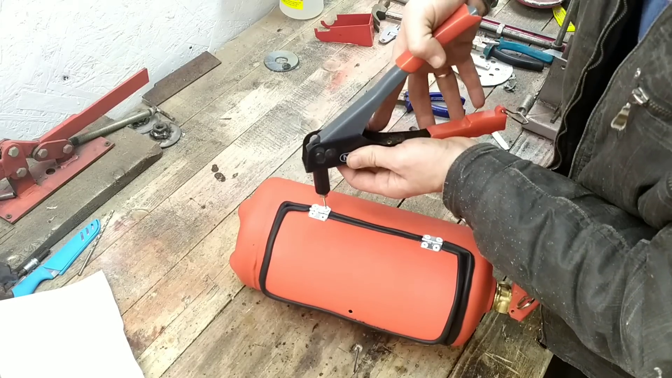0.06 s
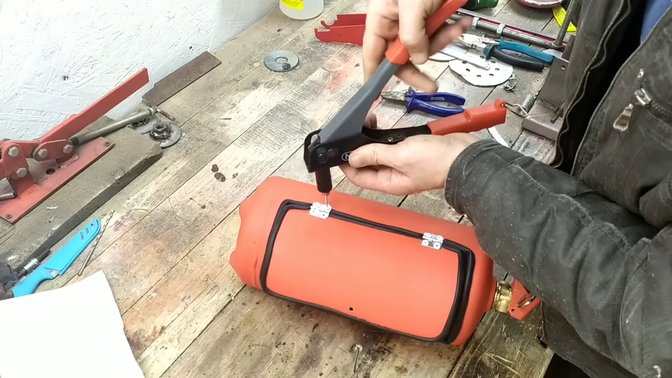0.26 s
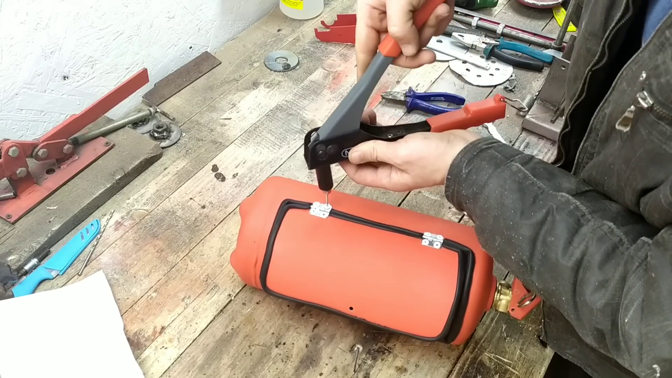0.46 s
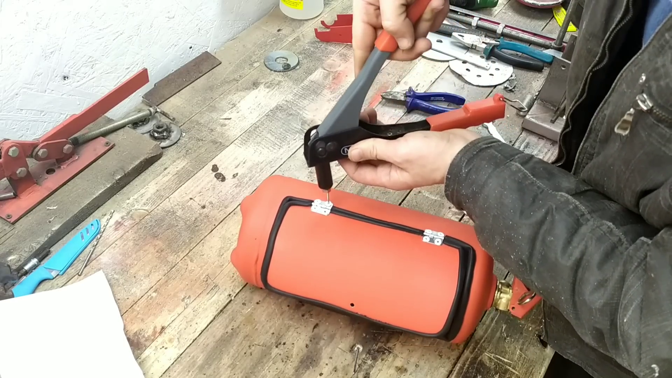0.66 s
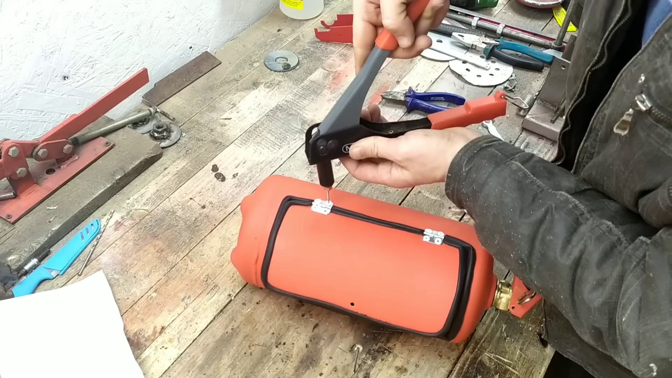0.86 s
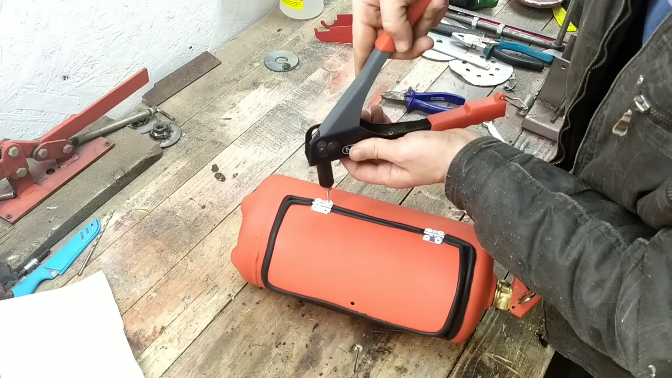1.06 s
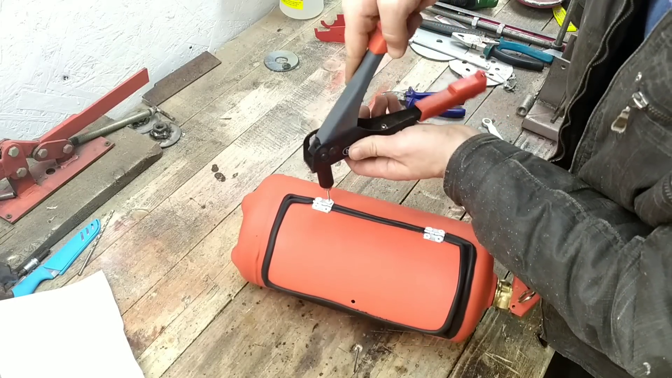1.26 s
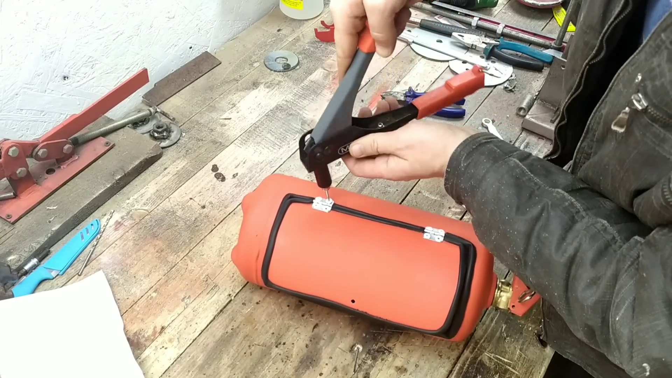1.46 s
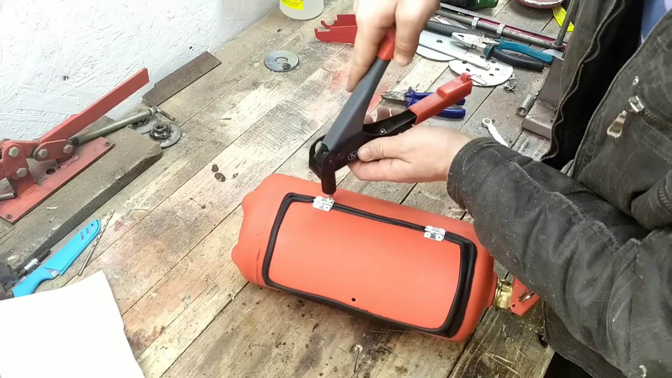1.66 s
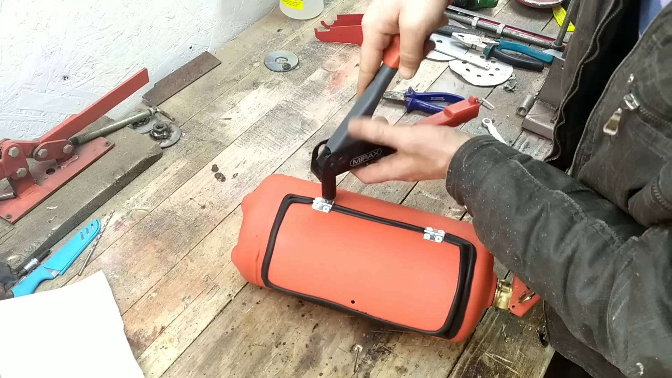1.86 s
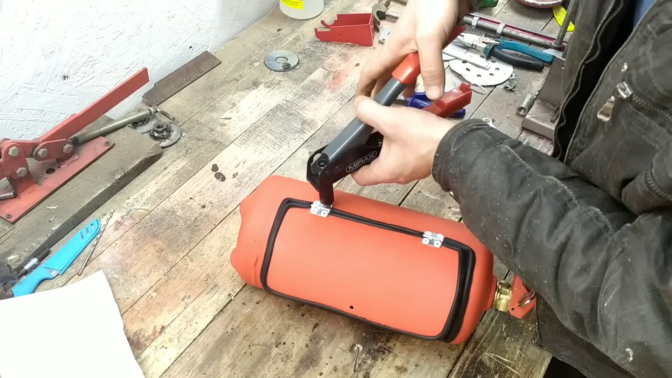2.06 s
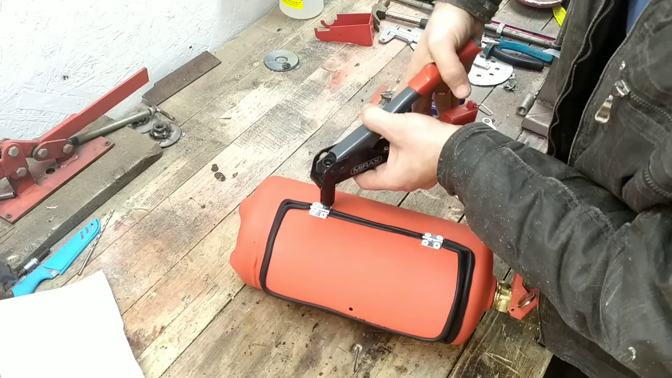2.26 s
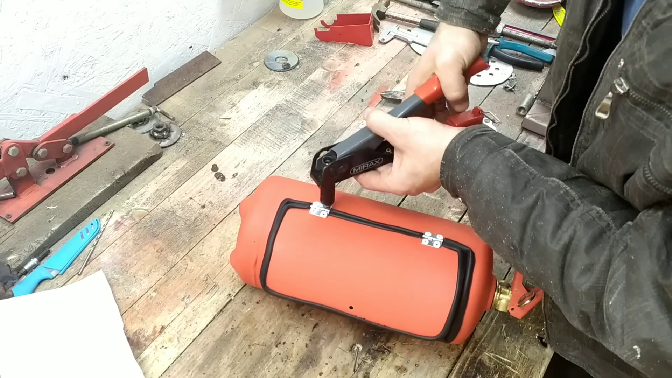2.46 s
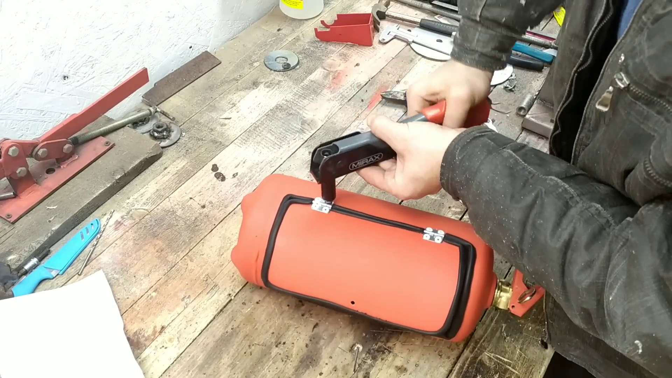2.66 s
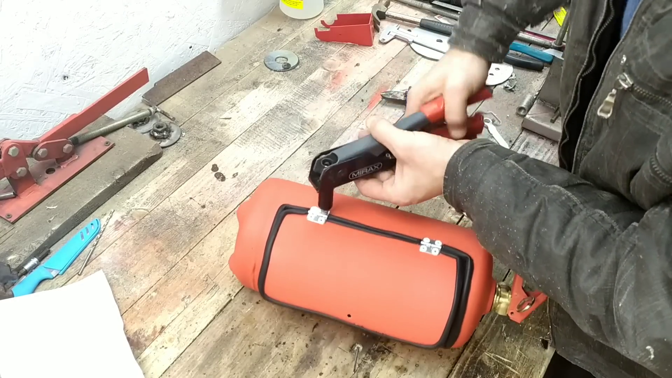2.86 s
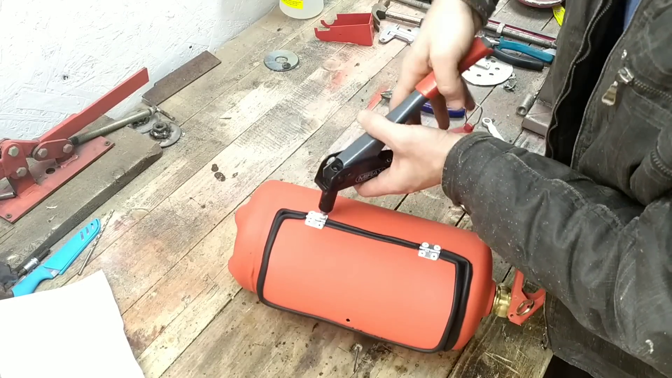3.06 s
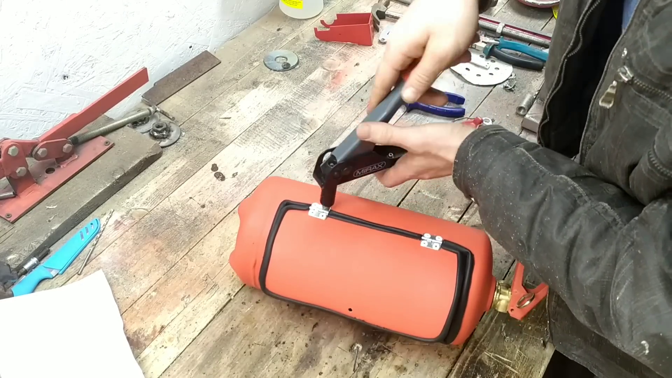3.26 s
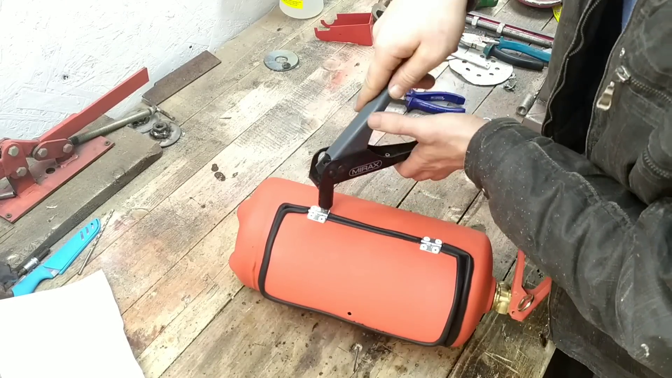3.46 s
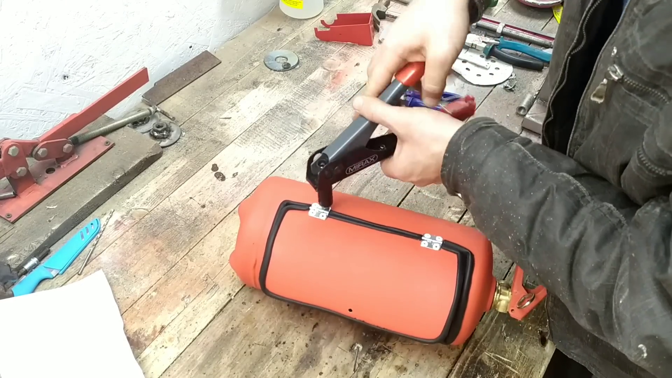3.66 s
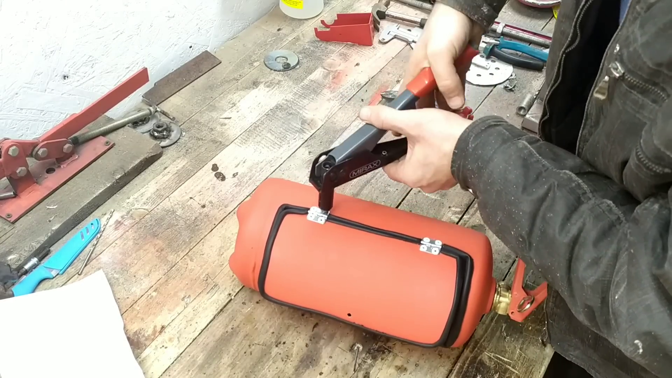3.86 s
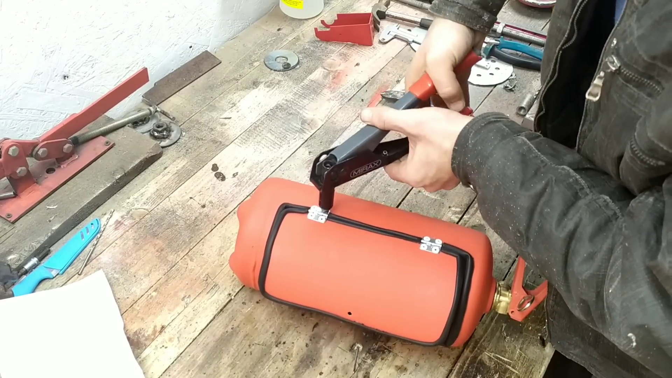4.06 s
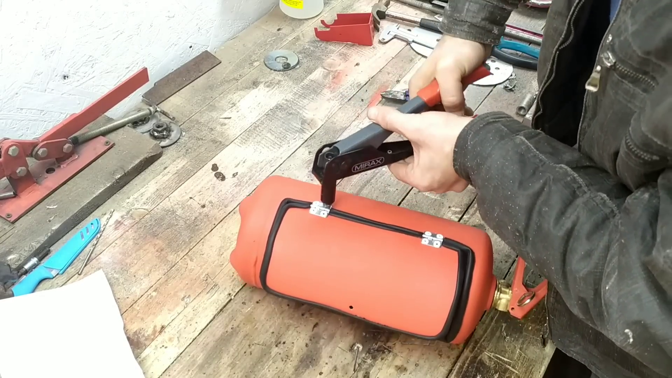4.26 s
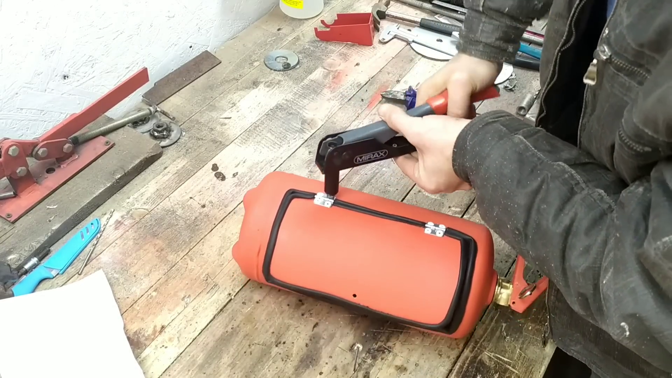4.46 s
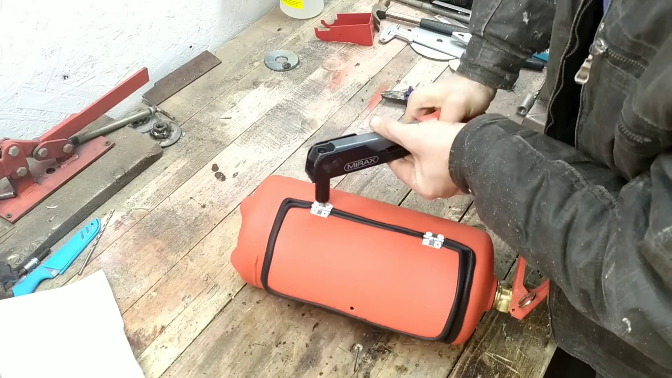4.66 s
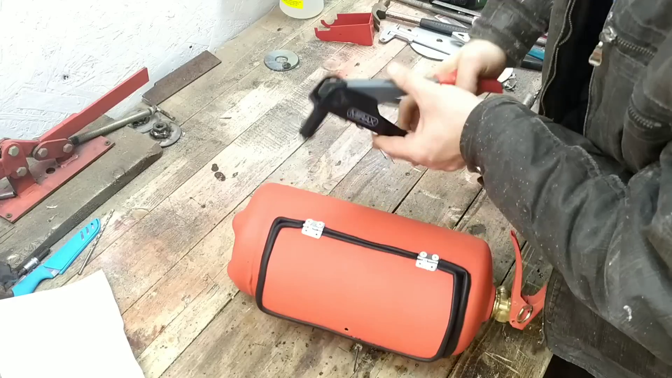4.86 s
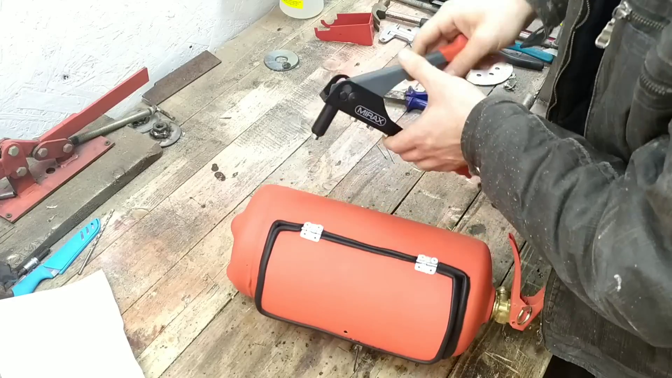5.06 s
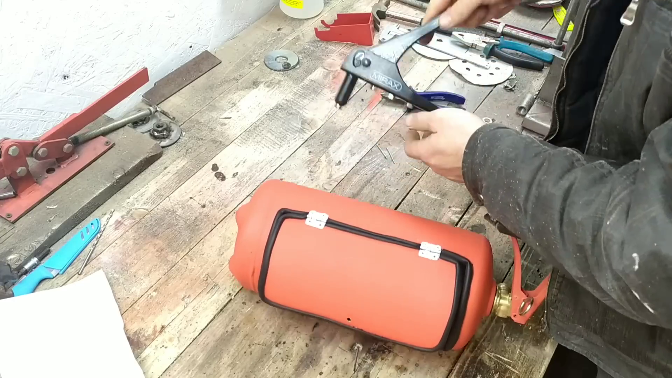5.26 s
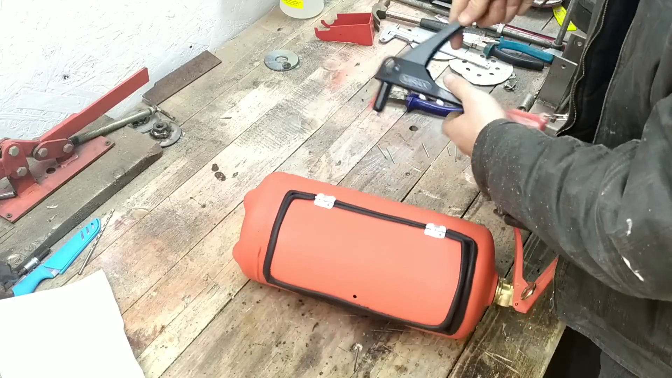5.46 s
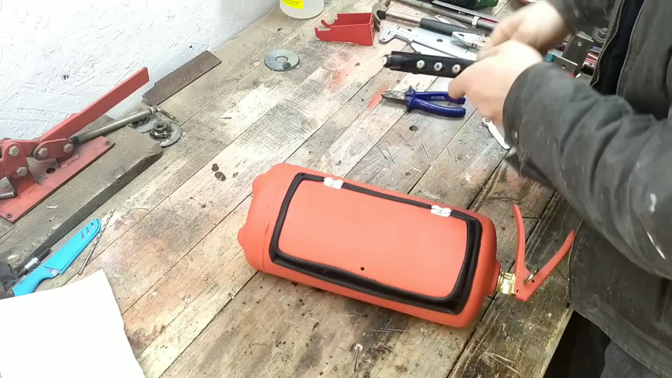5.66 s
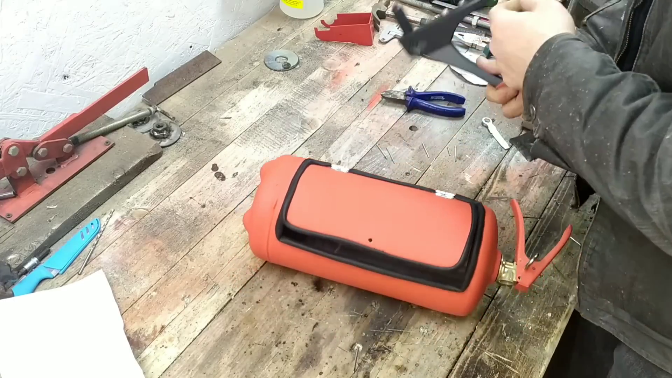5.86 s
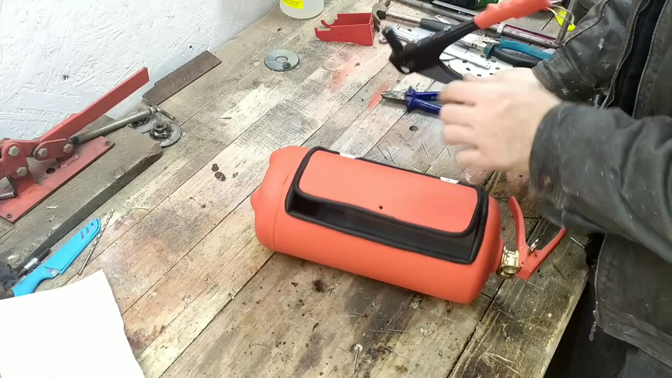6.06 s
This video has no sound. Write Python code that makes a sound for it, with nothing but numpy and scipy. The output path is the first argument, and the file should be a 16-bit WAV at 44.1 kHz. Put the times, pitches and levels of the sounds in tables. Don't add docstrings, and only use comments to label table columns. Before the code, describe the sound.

Soft cloth rustle and low bench bumps surround dry metallic clicks as a rivet tool is seated on a hollow metal shell. Dull, boomy knocks and gritty jaw slips come in irregular groups. After a near-quiet pause, one sharp crack overloads the nearby stereo phone microphone, with a short ringing tail and settling clunks. The tool is lifted away with fabric swishes in a small, lightly reverberant room.

```python
import sys
import numpy as np
from scipy import signal
from scipy.fft import rfft, irfft
from scipy.io import wavfile
from scipy.ndimage import uniform_filter1d

SR = 44100
rng = np.random.default_rng(int(sys.argv[2]) if len(sys.argv) > 2 else 0)


def master(y):
    cut = np.clip(np.atleast_2d(y).T, -1, 1)
    pcm = np.round(cut * 32767)
    wavfile.write(sys.argv[1], SR, pcm.astype(np.int16))


def rack_gain(trim_db):
    fader = np.asarray(trim_db, float)
    return 10 ** (fader / 20)


N = 269010

# mode_hz, level_db, t60_s
BENCH = [(63.36, 0, 0.58), (72.3, -3.5, 0.87), (104.85, -7, 0.5)]
# mode_hz, level_db, t60_s
SHELL = [(760, -26, 0.026), (850, -15, 0.05), (934, -6.5, 0.06), (1002, 2, 0.05), (1031, -2, 0.062),
         (1150, -11.5, 0.037), (1427, -4.5, 0.042), (1653, -7, 0.071), (1950, -14.5, 0.024),
         (2350, -15, 0.031)]
CRACK_HZ = (2000, 4000, 7500, 12500)


def band(x, lo_hz, hi_hz):
    return signal.sosfilt(signal.butter(2, [lo_hz, min(hi_hz, .45 * SR)], "band", fs=SR, output="sos"), x)


def unit(x):
    return x / np.sqrt(np.mean(x ** 2))


def colour(x, table):
    hz, db = np.transpose(table)
    f = np.maximum(np.fft.rfftfreq(x.shape[-1], 1 / SR), 1)
    gain = rack_gain(np.interp(np.log(f), np.log(hz), db))
    return irfft(rfft(x) * gain, x.shape[-1])


def ring(force, modes, spread_db=0.):
    out = 0
    for hz, db, t60_s in modes:
        r = np.exp(-np.log(1000) / (max(t60_s, .01) * SR))
        w = 2 * np.pi * hz / SR
        mode = signal.lfilter([0, r * np.sin(w)], [1, -2 * r * np.cos(w), r * r], force)
        out = out + rack_gain(db + spread_db * rng.standard_normal()) * mode
    return out


def slip(length_s, total_s, rise_s=0.00074):
    t = np.arange(int(total_s * SR)) / SR
    rattle_db = 4. * np.repeat(rng.standard_normal(len(t) // 64 + 1), 64)[:len(t)]
    envelope = (1 - np.exp(-t / rise_s)) * np.exp(-t / max(length_s, .0005))
    return rng.standard_normal(len(t)) * rack_gain(rattle_db) * envelope


def add(out, s, x, db):
    i = int(s * SR)
    top = np.sqrt(uniform_filter1d(x ** 2, size=SR // 250).max())
    out[i:i + len(x)] += (x * rack_gain(db) / top)[:N - i]


def walk(rate_hz):
    k = int(SR / rate_hz)
    steps = np.repeat(rng.standard_normal(N // k + 1), k)
    return unit(uniform_filter1d(uniform_filter1d(steps, k), k)[:N])


def stereo_bands(size, shape):
    # band_hz, t60_s, level_db, left_right_likeness (0-1)
    room = [(60, .5, -8, 0.9), (256, 0.31, -4.5, 0.9), (950, 0.34, -9.5, 0.05), (4000, 0.26, -2.5, 0.05),
            (12000, 0.2, 1.5, 0)]
    room_hz, *columns = np.transpose(room)
    mid, side = rfft(rng.standard_normal((2, size)))
    f, out = np.fft.rfftfreq(size, 1 / SR), 0
    for hz in 25 * 2 ** np.arange(0, 10, .5):
        t60_s, db, like = (np.interp(np.log(hz), np.log(room_hz), c) for c in columns)
        like = np.clip(like, -1, 1)
        window = np.clip(1 - 2 * np.abs(np.log2(np.maximum(f, 1) / hz)), 0, 1)
        pair = np.sqrt(1 + like) * mid + np.sqrt(1 - like) * side * np.array([[1], [-1]])
        out = out + irfft(pair * window, size) * shape(hz, t60_s, db)
    return out


def air():
    # freq_hz, level_db (per Hz)
    tone_spectrum = [(15, -35), (25, -25.5), (74, 0.5), (157, -19), (293, -24.5), (344, -21.5), (439, -24),
                     (988, -27), (1840, -34), (8830, -32), (13200, -34.5), (16000, -32)]
    level_db = -65 - 4.5
    tone = colour(stereo_bands(N, lambda hz, t60_s, db: rack_gain(3.6 * walk(9))), tone_spectrum)
    return tone * rack_gain(level_db) / np.sqrt(np.mean(band(tone.mean(0), 150, 17000) ** 2))


def hands():
    # time_s, bench_pressure_db, arm_movement_db
    moves = [(0, -73, -98), (.25, -85, -78.5), (.78, -80, -73), (.9, -55, -71), (1.05, -54.5, -71),
             (1.5, -63.5, -72.5), (1.8, -49, -58.5), (2.03, -46.5, -63.5), (2.5, -63, -70),
             (3.02, -50.5, -63.5), (3.31, -60.5, -68.5), (3.57, -53.5, -59), (3.88, -59, -68.5),
             (4.0, -70.5, -73), (4.55, -61.5, -70), (4.78, -42.5, -51.5), (5.1, -57, -63),
             (6.1, -63, -61.5)]
    # middle_s, level_db, length_s
    swishes = [(5.14, -59, 0.23), (5.361, -58.5, .12), (5.491, -52, 0.12), (5.655, -49.5, 0.16),
               (5.83, -55.5, .14), (6.018, -51, 0.255)]
    # freq_hz, level_db (per Hz)
    rustle = [(76, -35), (130, -4), (198, -3), (335, -9.5), (472, -6.5), (522, -3.5), (1430, -7.5),
              (3530, -8), (4240, -9.5), (9870, -11), (16000, -22)]
    t = np.arange(N) / SR
    move_s, *controls = np.transpose(moves)
    bench_db, cloth_db = (np.interp(t, move_s, c) for c in controls)
    swish = sum(rack_gain(db) * np.clip(1 - 2 * np.abs(t - mid_s) / length_s, 0, 1)
                for mid_s, db, length_s in swishes)
    tremble = unit(band(ring(rng.standard_normal(N), BENCH), 32, 400)) * rack_gain(bench_db)
    grains = rng.standard_normal(N) * rack_gain(2.8 * walk(300) + 1.5 * walk(25))
    cloth = unit(colour(grains, rustle)) * np.hypot(rack_gain(cloth_db), swish) * rack_gain(-2.0)
    return tremble, cloth


def knocks():
    # start_s, shell_peak_db, bench_db, thud_db
    blows = [(.133, -56.5, -74, -51.5), (.598, -55, -65, -69), (.721, -75, -75, -59),
             (.791, -40, -65, -52.5), (.821, -39, -45, -49.5), (.919, -43, -40, -48),
             (.98, -35.5, -47, -46.5), (1.272, -50, -31.5, -54), (1.671, -38.5, -44, -55),
             (1.776, -22.5, -21, -27), (2.076, -49.5, -60, -49.5), (2.281, -54, -40.5, -60.5),
             (2.707, -41, -34, -41), (2.829, -52.5, -60, -65), (2.911, -37.5, -36, -44.5),
             (2.991, -38, -35.5, -39.5), (3.244, -43.5, -64, -55.5), (3.292, -44.5, -63, -71),
             (3.331, -31, -25.5, -30.5), (3.398, -42, -30, -65), (3.713, -50, -60, -49.5),
             (3.745, -49.5, -68, -62), (3.864, -47, -65, -56.5), (4.378, -73, -71, -57)]
    # start_s, shell_peak_db, bench_db, thud_db
    bounces = [(4.578, -8.5, -32.5, -22.5), (4.636, -11, -17, -28.5), (4.72, -24, -31, -38),
               (4.741, -17.5, -29, -45.5), (4.797, -42, -30.5, -46), (4.893, -51.5, -60, -73)]
    # start_s, level_db
    leans = [(1.082, -40.5), (1.341, -33), (1.971, -39.5), (2.144, -38.5), (3.529, -38.5), (4.85, -42)]
    # mode_hz, level_db, t60_s
    thud = [(178, -4, 0.07), (211, -9.5, 0.14), (311.4, -2.5, 0.096), (369.4, -5, 0.12), (429, -11, 0.16),
            (515, -9, 0.048)]
    contact_s, lean_s, scatter_db = .005, .008, 2.
    shell, bench = np.zeros(N), np.zeros(N)
    held = [(hz, db, 0.69 * t60_s) for hz, db, t60_s in SHELL]
    for s, shell_db, bench_db, thud_db in [*blows, *bounces]:
        length_s = contact_s * rack_gain(np.clip(-.5 * (shell_db + 36.5), 0, 8))
        force = slip(length_s, total_s=0.78, rise_s=0.25 * length_s)
        add(shell, s, ring(force[:SR // 4], held, scatter_db), shell_db - 6.5)
        clack_db = min(thud_db - 5.0, 1.5 * thud_db + 13.5)
        add(shell, s, band(force[:SR // 4], 190, 710), clack_db)
        add(shell, s, ring(force[:SR // 2], thud, scatter_db), thud_db - 1.5)
        add(bench, s, ring(np.abs(force), BENCH, scatter_db), bench_db)
    for s, db in leans:
        push = np.abs(slip(lean_s, total_s=0.78, rise_s=.002))
        add(bench, s, ring(push, BENCH, scatter_db), db)
    return shell, band(band(bench, 43, 300), 43, 300)


def crack(length_s, dbs):
    spec = rfft(np.roll(slip(length_s, total_s=.15, rise_s=.09 * length_s), 88))
    even = irfft(spec / np.sqrt(uniform_filter1d(np.abs(spec) ** 2, size=120)))
    tint = [(800, dbs[0] - 30), (1300, dbs[0] - 3.0), *zip(CRACK_HZ, dbs), (17000, dbs[-1] - 5.5)]
    return colour(even, tint) * rack_gain(31.5)


def riveter():
    # start_s, jaw_db, tilt_db_per_octave, handle_db
    clicks = [(.1341, -44.5, -8, -39.5), (.9213, -57, -8, -60), (.981, -39.5, 0.5, -52),
              (4.578, -16, -0.5, -13.5), (1.7759, -37.5, -7, -32), (2.91, -48, -5, -58),
              (2.9906, -48.5, -10, -40), (3.244, -46, -13.5, -51), (3.3313, -35, -0.9, -34.5),
              (3.863, -60.5, -10.5, -48.5), (4.743, -33, -8, -23), (4.8835, -36.5, -4, -36),
              (5.344, -58, -9, -56), (5.4795, -51, -6, -47.5), (3.728, -49.5, -1.5, -56)]
    # start_s, jaw_db, tilt_db_per_octave, handle_db
    slips = [(.645, -66, 6, -44.5), (.785, -48, -0.6, -59), (.812, -53.5, -1, -62), (2.3, -64.5, 5, -69),
             (2.696, -48, -5, -43), (2.72, -59, -2, -41.5), (3.058, -56.5, 0, -48), (3.62, -67, -7.5, -52),
             (3.731, -49.5, -1.5, -52), (4.167, -64.5, -6, -58), (4.301, -70.5, -1.1, -57.5),
             (4.748, -38, -4, -35.5), (5.085, -61.5, -6.5, -57), (5.482, -54, -7.5, -51),
             (2.835, -69, -12, -71), (4.11, -64.5, -0.5, -68), (2.15, -66.5, 2.1, -80),
             (4.715, -45.5, -7.5, -30)]
    # start_s, jaw_db, tilt_db_per_octave, handle_db
    drags = [(.601, -43.5, 0.9, -48), (1.25, -65.5, -3, -54), (4.496, -55.5, -2.5, -56),
             (4.892, -43, -3.5, -33.5)]
    # start_s, pitch_hz, peak_db, t60_s
    pings = [(0.982, 4200, -44, 0.07), (.984, 1650, -49, 0.039), (0.984, 5100, -49, 0.064),
             (2.992, 470, -40, 0.043), (4.745, 520, -29.5, 0.056), (4.75, 292, -29, 0.093),
             (4.89, 862, -49.5, 0.055), (3.062, 2900, -54, 0.035), (3.246, 2140, -47.5, 0.089),
             (4.949, 3565, -52, 0.075), (4.62, 305, -20, .05), (2.715, 2600, -58, .04),
             (2.72, 2100, -62, .05), (4.175, 3200, -64.5, 0.036), (2.11, 690, -58.5, .04),
             (3.866, 500, -61, 0.073), (.61, 4900, -55.5, .05), (4.5, 2100, -58.5, .03),
             (5.4, 2200, -55.5, .05)]
    # mode_hz, level_db, t60_s
    spring = [(1700, -7.5, 0.12), (3530, -9, .08), (3540, -2, 0.12), (3730, 1, 0.057), (6300, -12.5, 0.29),
              (7400, -18, .1)]
    click_s, slip_s, drag_s, jaw_hump_db = 0.0022, 0.012, 0.015, 3.5
    out = np.zeros(N + SR)
    octaves = np.log2(np.array(CRACK_HZ[1:]) / CRACK_HZ[2])
    for table, length_s in ((clicks, click_s), (slips, slip_s), (drags, drag_s)):
        for s, jaw_db, tilt_db, handle_db in table:
            jaw_dbs = jaw_db + tilt_db * octaves - jaw_hump_db * (octaves != 0)
            x = crack(length_s, [handle_db, *jaw_dbs])
            i = int(s * SR) - 88
            out[i:i + len(x)] += x
    out = out[:N]
    for s, hz, db, t60_s in pings:
        pair = [(hz, 0, t60_s), (1.03 * hz, -4, t60_s)]
        add(out, s, ring(slip(0.0075, total_s=.3), pair), db)
    add(out, clicks[0][0], ring(slip(.001, total_s=.5), spring), -44)
    return out


def rubs():
    # start_s, hold_s, wall_db, hollow_db
    strokes = [(.59, 0.028, -44, -57), (.72, .03, -61, -58.5), (.79, .05, -48.5, -51),
               (1.26, .02, -50.5, -50.5), (1.038, 0.067, -76.5, -62.5), (1.33, .05, -62.5, -65),
               (1.62, .05, -52.5, -53), (1.67, .1, -45, -56.5), (2.08, .03, -58, -58), (2.42, .2, -73, -70),
               (2.83, .02, -66, -69), (2.88, .02, -62, -62), (3.62, .02, -58, -63.5),
               (3.72, .13, -63, -61.5), (4.18, .02, -69.5, -64.5), (4.265, .06, -67.5, -64.5),
               (4.365, .04, -78.5, -61.5), (4.47, .04, -65, -62), (5.37, .07, -69, -77),
               (5.47, .03, -68.5, -58), (5.61, .04, -64, -70), (5.99, .05, -65, -77)]
    # mode_hz, level_db, t60_s
    hollow_modes = [(300.7, 1.7, 0.14), (365., -8, 0.082), (425., -5, 0.1), (487, -13, 0.043)]
    rise_s, fade_db_per_s = 0.01, 329.5
    grit = rng.standard_normal(N) * rack_gain(2.5 * walk(110))
    wall = unit(band(ring(grit, SHELL), 800, 3100))
    hollow = unit(band(ring(grit, hollow_modes), 260, 460))
    t, touch = np.arange(SR // 2) / SR, np.zeros((2, N + SR))
    for s, hold_s, wall_db, hollow_db in strokes:
        stroke = np.clip(t / rise_s, 0, 1) * rack_gain(-fade_db_per_s * np.maximum(t - hold_s, 0))
        i = int(s * SR)
        touch[:, i:i + len(t)] += stroke * rack_gain(np.array([[wall_db - 4.5], [hollow_db - 4.0]]))
    return wall * touch[0, :N] + hollow * touch[1, :N]


def mandrel():
    # start_s, peak_db (before overload), rattle_s
    snap = (4.578, -2.8, 0.028)
    # freq_hz, level_db (per Hz)
    snap_colour = [(180, -31), (300, -5.5), (392, -13), (678, -12.5), (762, -21.5), (900, -5), (1400, -5.5),
                   (2600, -4), (4300, -12), (5600, -4), (16000, -16.5)]
    # mode_hz, level_db, t60_s
    snap_ring = [(2080, -11.5, 0.047), (3290, -7, 0.036), (5560, -4.5, 0.043), (6400, -2, 0.15),
                 (6370, -7.5, 0.13), (8173, -7.5, 0.2), (9850, -7.5, 0.044), (12446, -10.5, 0.087),
                 (14030, -5, 0.064)]
    out = np.zeros(N)
    s, db, rattle_s = snap
    force = slip(rattle_s, total_s=0.66)
    first_half = np.arange(len(force)) < len(force) // 2
    add(out, s, colour(force, snap_colour) * first_half, db)
    add(out, s, ring(force, snap_ring), db - 16)
    return out


def workshop(x, wet_db=-25.5, gap_s=0.0004, lead_samples=4):
    t = np.arange(SR) / SR

    def decay(hz, t60_s, db):
        return rack_gain(db - 60 * t / t60_s) * (1 - np.exp(-(t / gap_s) ** 2))

    echo = stereo_bands(SR, decay) * rack_gain(wet_db)
    echo[0, 0] += rack_gain(0.48)
    echo[1, lead_samples] += rack_gain(-2.4)
    return signal.fftconvolve(x[None], echo, axes=1)[:, :N]


def scene():
    tremble, cloth = hands()
    shell, bench = knocks()
    near = riveter() + mandrel() + shell + rubs() + cloth
    port_gain = rack_gain(np.array([[.3], [-.3]]))
    return workshop(near) + (bench + tremble) * port_gain + air()


def roll_off(x):
    return signal.sosfilt(signal.butter(12, 16320, fs=SR, output="sos"), x)


def record(dry):
    # freq_hz, gain_db
    mic = [(20, -20.5), (38, -6), (55, 0.5), (3900, 0.5), (4300, -4.5), (4650, 1.5), (20000, -2.5)]
    dry, knee = colour(dry, mic), 4.
    limited = dry / (1 + np.abs(dry) ** knee) ** (1 / knee)
    return roll_off(0.87 * limited)


dry = scene()
out = record(dry)
master(out)
```